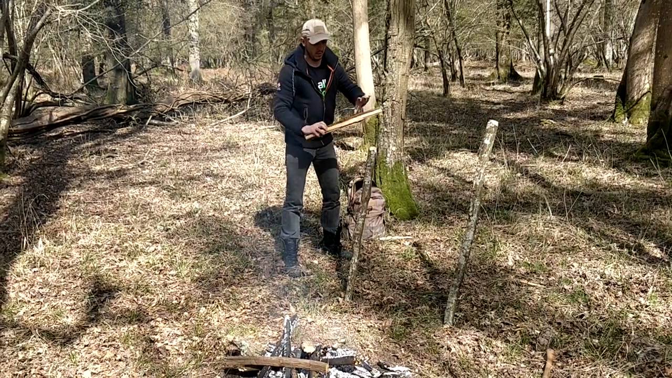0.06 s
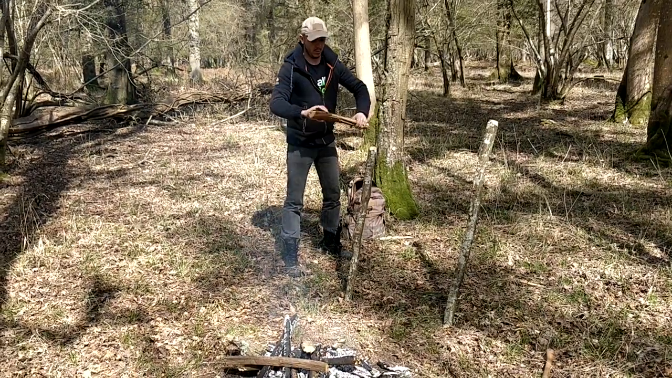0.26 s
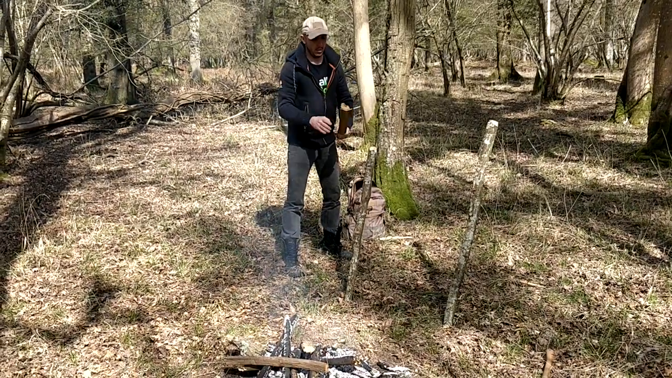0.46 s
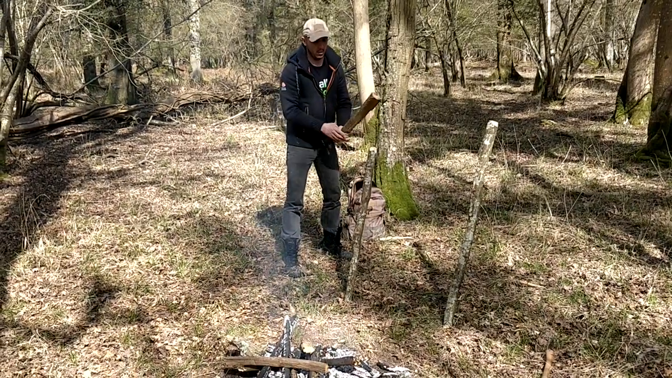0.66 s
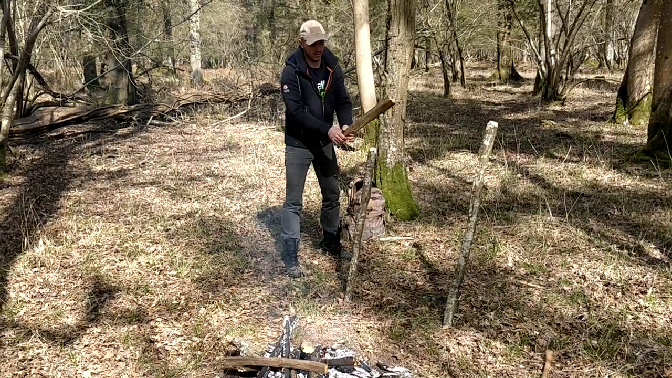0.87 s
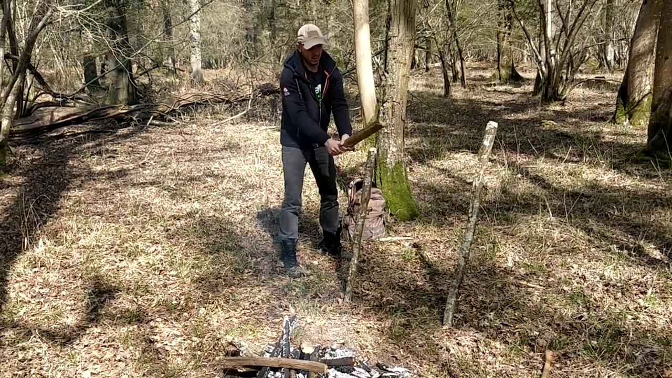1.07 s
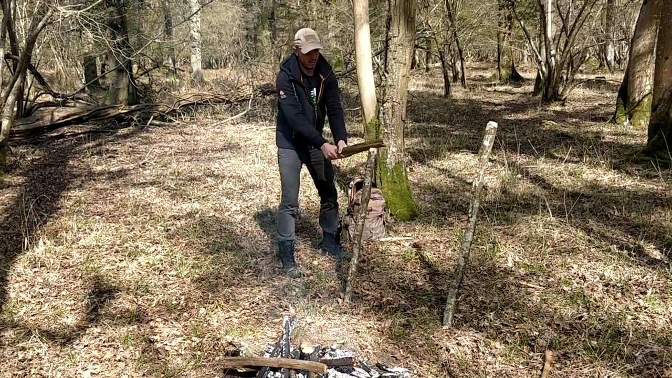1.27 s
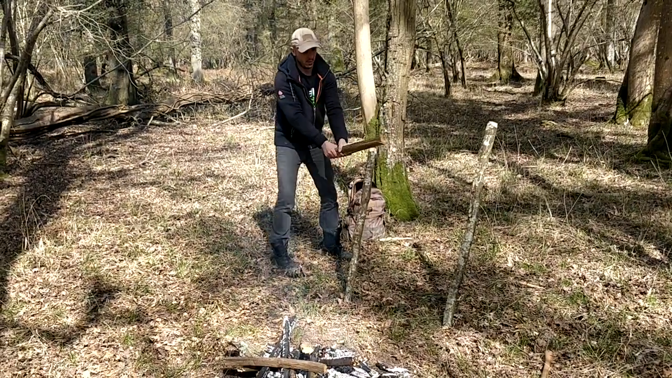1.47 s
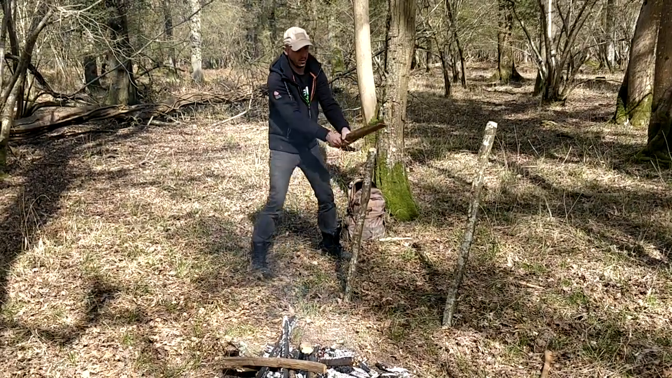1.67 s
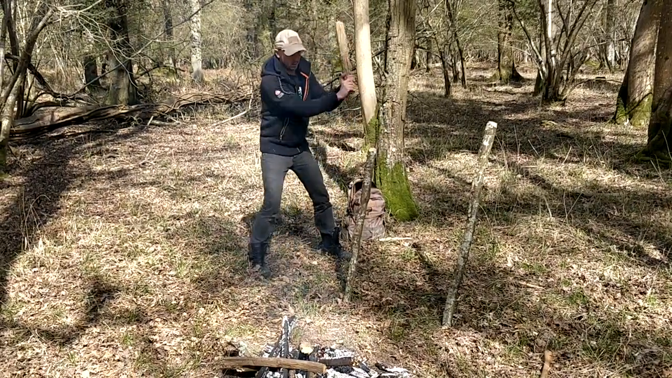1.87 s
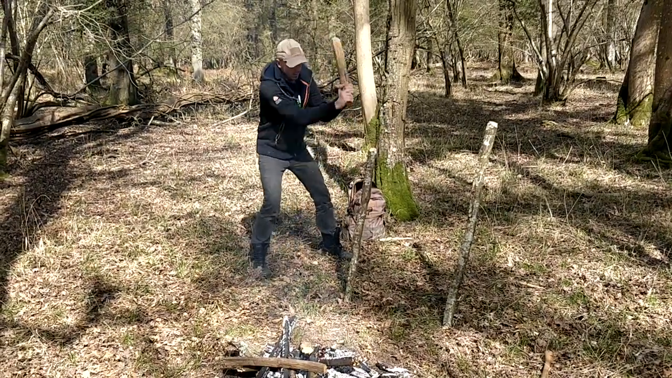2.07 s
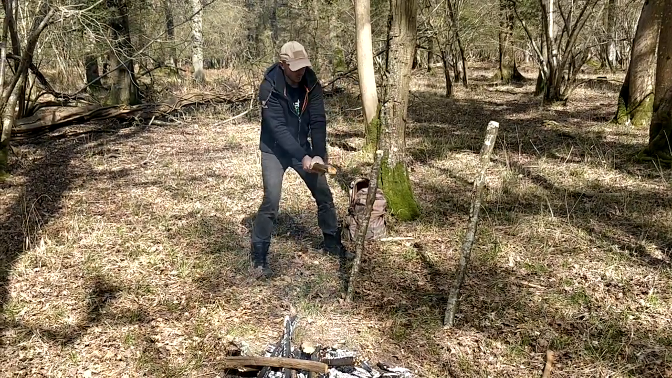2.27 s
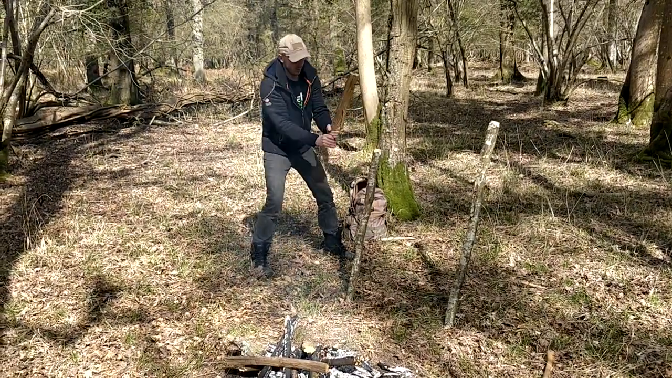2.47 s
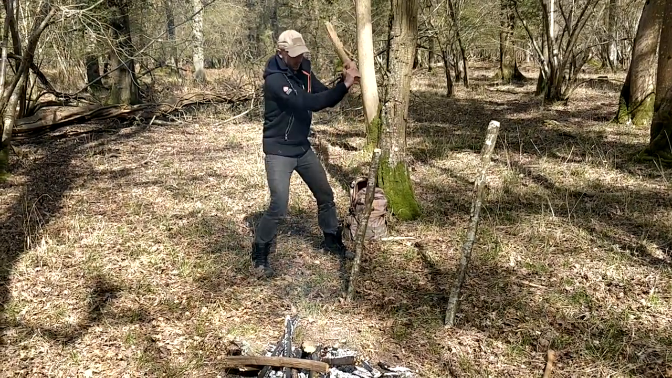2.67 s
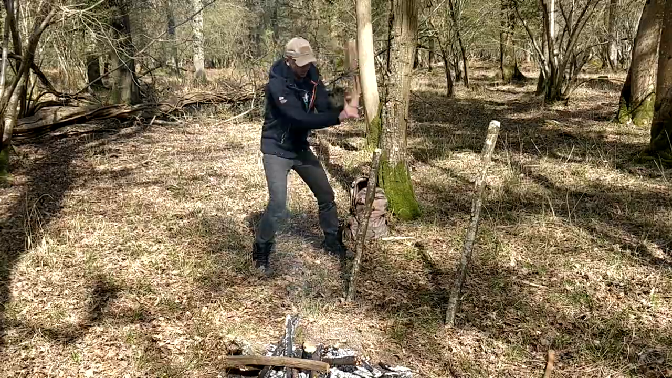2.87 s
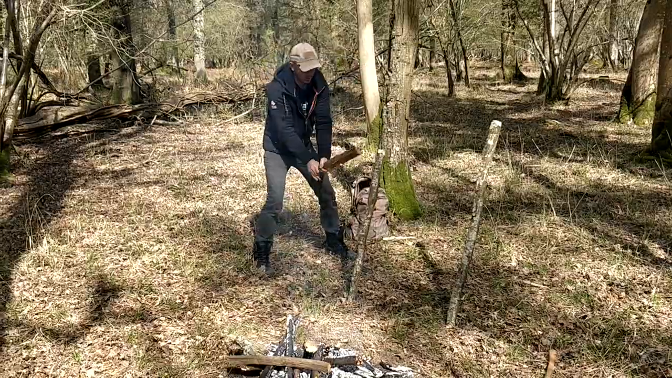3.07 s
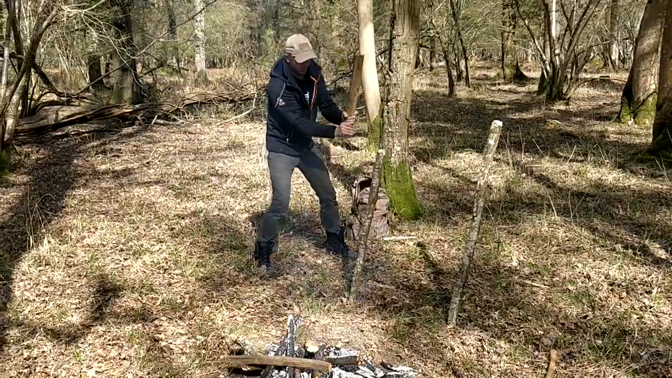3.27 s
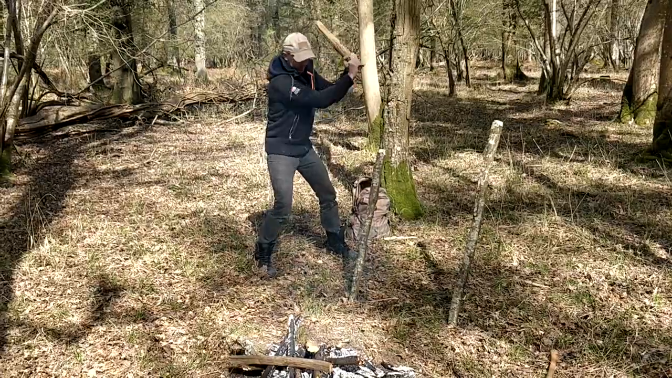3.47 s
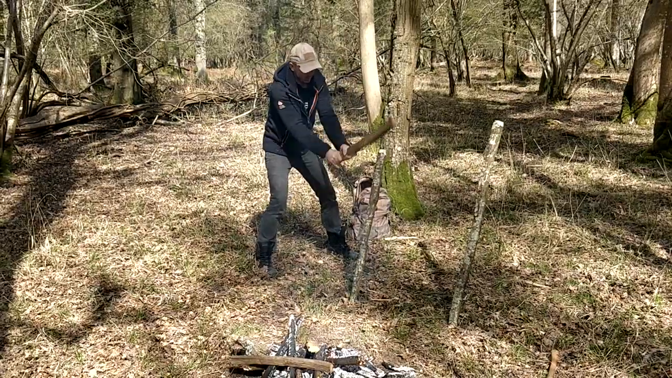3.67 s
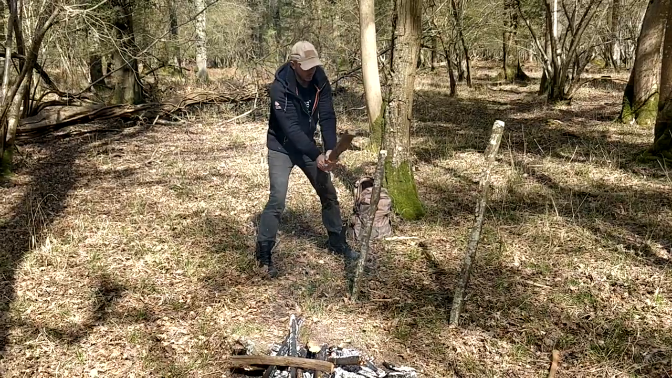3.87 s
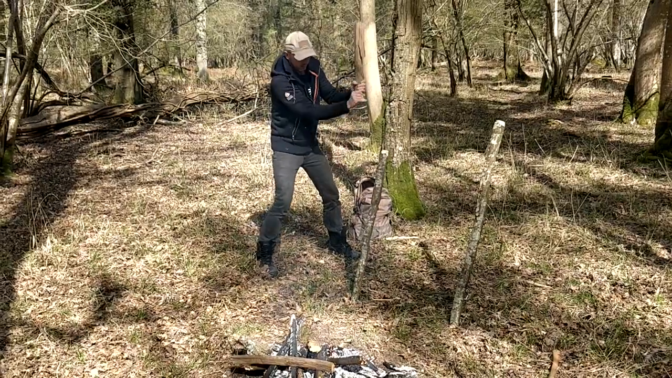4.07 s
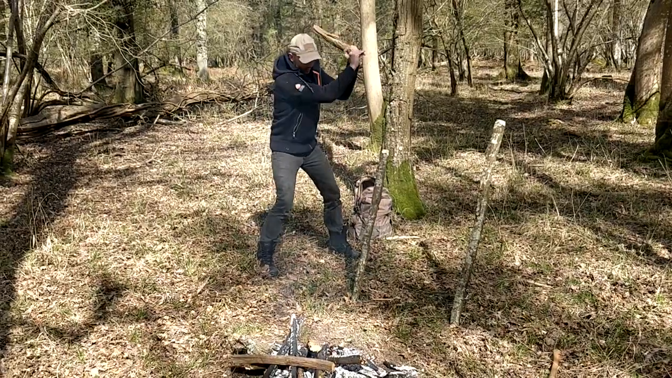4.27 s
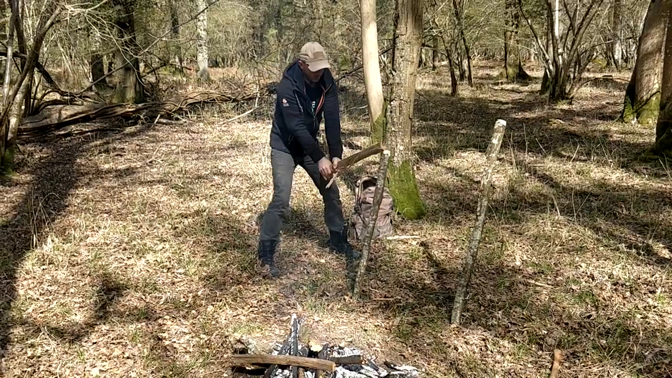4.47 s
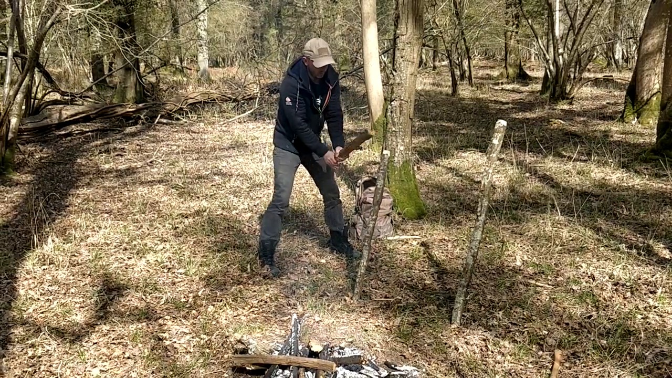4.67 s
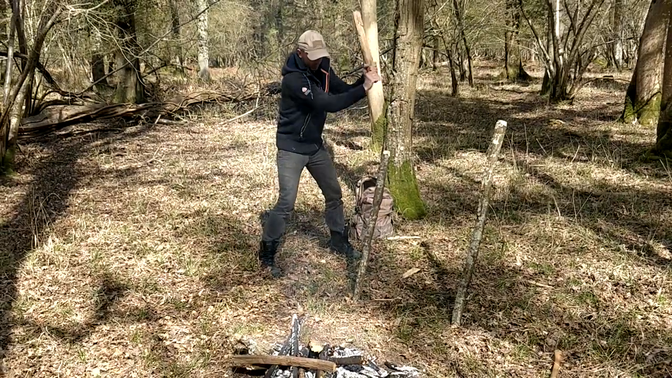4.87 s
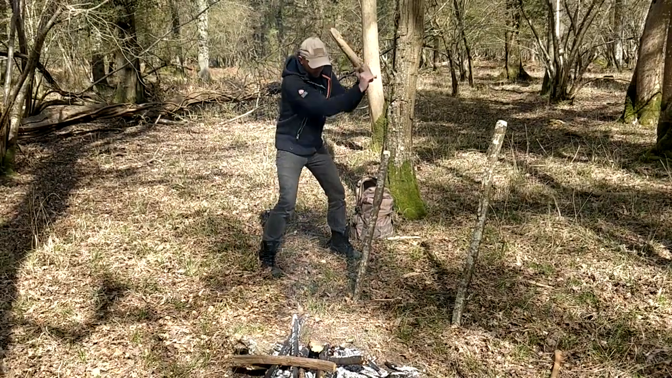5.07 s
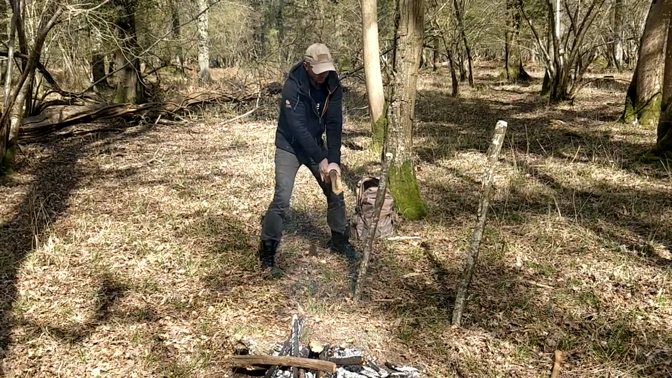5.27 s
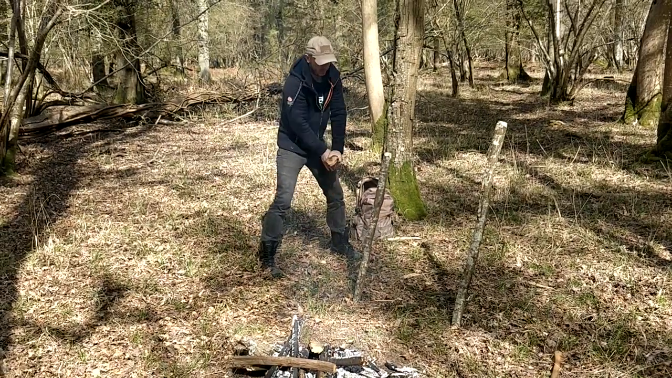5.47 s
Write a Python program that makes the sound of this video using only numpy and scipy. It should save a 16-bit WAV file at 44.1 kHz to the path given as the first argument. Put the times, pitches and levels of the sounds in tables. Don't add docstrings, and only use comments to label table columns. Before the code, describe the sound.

A quiet wood with a far, low rumble and faint airy hiss. In the first second, wind buffets the microphones in soft low flutters, a distant bird gives a few tiny high whistles before 0.6 s, and a jacket rustles with small crackles. At 1.2 s a wooden club knocks a stake: short, hollow, woody, with a soft thud of soil. A much weaker tap follows at 1.57 s amid brisk cloth rubbing. Solid blows then land at about 2.2, 3.0, 3.75, 4.5 and 5.2 s, the last strongest. Each knock dies within a tenth of a second, then trunks return dull, quick echoes and a grainy haze fading over half a second or more. A faint low hum trails the 2.2 s hit. Between blows come sleeve scuffs, leaf snaps and foot shuffles, notably near 2.5, 3.2, 4.35 and 4.7-4.8 s. Wind stirs lightly again after 5 s.

```python
import sys
import numpy as np
from scipy import signal
from scipy.fft import rfft, irfft, next_fast_len
from scipy.io import wavfile
from scipy.ndimage import map_coordinates

SR = 44100
rng = np.random.default_rng(int(sys.argv[2]) if len(sys.argv) > 2 else 0)


def file_out(sig):
    cols = np.atleast_2d(sig).T
    lim = np.clip(cols, -1, 1)
    pcm = np.round(lim * 32767).astype(np.int16)
    wavfile.write(sys.argv[1], SR, pcm)


def gain_from_decibels(decibels):
    exponent = np.asarray(decibels, float) / 20
    return 10 ** exponent


N = 244049


def unit(x):
    return x / np.sqrt(np.mean(x ** 2) + 1e-20)


def along(points, hz, column=1):
    rows = np.array(points)
    return np.interp(np.log(hz + 1), np.log(rows[:, 0] + 1), rows[:, column])


def wobble(rate):
    knots = rng.standard_normal(int(N * rate / SR) + 4)
    return map_coordinates(knots, [np.arange(N) * rate / SR])


def filtered(x, response):
    m = next_fast_len(x.shape[-1] + 4096)
    spectrum = rfft(x, m) * response(np.fft.rfftfreq(m, 1 / SR))
    return irfft(spectrum, m)[..., :x.shape[-1]]


def add(out, s, sound):
    part = out[:, round(s * SR):][:, :sound.shape[1]]
    part += sound[:, :part.shape[1]]


def swells(rows, floor_db):
    power = np.full(N, gain_from_decibels(floor_db) ** 2)
    for s, db, rise, fall in rows:
        near = np.arange(max(round((s - .3) * SR), 0), min(round((s + .8) * SR), N))
        u = near / SR - s
        level = np.where(u < 0, np.exp(-(u / rise) ** 2), gain_from_decibels(-60 * np.abs(u) / fall))
        power[near] += (gain_from_decibels(db) * level) ** 2
    return np.sqrt(power)


# pitch_hz, left_db, right_db
PORT_TONE = [(196.3, -47.5, -41), (600, -29.5, -27.5), (1740, -6, -27.5), (3000, -0.5, -2), (4680, -5, 3),
             (6480, -4, -17), (8800, -18.5, -42.5), (10940, -9, -45.5), (12460, -2.5, -31.5),
             (16600, -12.5, -29.5), (16600, -36, -56)]


def ports(hz):
    return gain_from_decibels([along(PORT_TONE, hz, column=1), along(PORT_TONE, hz, column=2)])


def port_treble(hz):
    return ports(hz) / (1 + (7000 / (hz + 1)) ** 6)


def port_body(hz):
    return ports(hz) / (1 + (hz / 7000) ** 6)


# pitch_hz, likeness_0_to_1
PORT_LIKENESS = [(60, 0.99), (290, 0.88), (640, 0.36), (1400, 0), (3000, 0.042)]


def diffuse(pair):
    def mid_and_side(hz):
        turn = np.arccos(np.clip(along(PORT_LIKENESS, hz), -1, 1)) / 2
        return np.array([np.cos(turn), np.sin(turn)])
    mid, side = filtered(pair, mid_and_side)
    return np.array([mid + side, mid - side])


# pitch_hz, density_db_per_hz
FAR_TONE = [(21, -30.5), (35, 3.5), (68, -3.5), (124, -12.5), (197, -15.5), (497, -19.5), (694, -18.5),
            (1020, -29), (1760, -33), (4000, -37), (7820, -40.5), (9120, -47.5), (13400, -40.5),
            (15300, -42.5), (16500, -50.5)]


def far_rumble():
    return unit(filtered(diffuse(rng.standard_normal((2, N))), lambda hz: gain_from_decibels(along(FAR_TONE, hz))))


# time_s, level_db, left_minus_right_db
WIND_LEVEL = [(0.0, -41.5, -9.5), (.08, -33.5, -4), (.4, -43, 0), (.48, -40.5, 6), (.6, -44, -20.5),
              (.71, -44, 7.5), (.9, -54, -9), (1.3, -60.5, -9), (1.54, -51.5, 15), (1.91, -52.5, 6.5),
              (2.26, -61.5, -9), (2.63, -50.5, 7.5), (3.101, -75.5, -6.5), (4.45, -67, -13),
              (4.96, -54, -9.5), (5.05, -56, 27), (5.12, -43, -6), (5.53, -59, -5)]
# pitch_hz, density_db_per_hz
WIND_TONE = [(8.8, -44), (15, 2), (32, -2.5), (58, -13), (168, -30.5), (200, -35.5), (260, -71),
             (440, -120)]


def wind():
    s, db, pan_db = np.transpose(WIND_LEVEL)
    level_db = [np.interp(np.arange(N) / SR, s, db + 4.0 + side * pan_db / 2) for side in (1, -1)]
    lumps = gain_from_decibels(0.89 * wobble(3.3) + 1.1 * np.array([wobble(5), wobble(4.7)]))
    flutter = filtered(rng.standard_normal((2, N)), lambda hz: gain_from_decibels(along(WIND_TONE, hz)))
    return gain_from_decibels(level_db) * unit(lumps * flutter)


def background():
    far = far_rumble()
    gusts = wind()
    return gain_from_decibels(-55.0 + 1.0 * wobble(1.8)) * far + gusts


def tone(start, end, hz, db):
    t = np.arange(round((end - start) * SR)) / SR
    drift = 1 + 0.002498 * wobble(70)[:len(t)]
    swell = np.sin(np.pi * t / (end - start)) ** .6
    wave = np.sin(2 * np.pi * hz * np.cumsum(drift) / SR)
    return gain_from_decibels(db) * np.sqrt(2) * swell * wave * np.ones((2, 1))


# start_s, end_s, pitch_hz, level_db
WHISTLES = [
    (.04, .12, 4050, -77),
    (.16, .22, 3250, -77),
    (.35, .4, 3120, -78),
    (.46, .55, 3150, -82),
]


def bird():
    out = np.zeros((2, N))
    for note in WHISTLES:
        add(out, note[0], tone(*note))
    return out


# start_s, end_s, pitch_hz, level_db
STAKE_HUM = (2.33, 2.53, 145, -53)


def stake_hum():
    out = np.zeros((2, N))
    add(out, STAKE_HUM[0], tone(*STAKE_HUM))
    return out


# time_s, tick_db, scuff_db, body_db, fall_t60_s
SNAGS = [(.376, -53, -54, -12, 0.15), (.4983, -50.5, -58.5, -25, .02), (.598, -44, -55, -6, 0.082),
         (0.9734, -44, -68, -2, 0.22), (1.7613, -33, -45.5, -28.5, 0.033), (1.939, -49, -52, -6.5, 0.019),
         (2.4854, -29, -37, -13, 0.21), (2.6789, -50, -55.5, -21, 0.096), (3.209, -49, -42, -2, 0.036),
         (2.6374, -48.5, -56.5, -4, 0.0782), (2.825, -55, -64.5, -13.5, .12),
         (3.4388, -55, -57.5, -5.5, 0.26), (3.484, -45.5, -56, -15, 0.52), (4.7337, -46, -61.5, -14, .12),
         (3.639, -52.5, -58, -15.5, 0.085), (3.895, -53, -53.5, -14.5, 0.03604),
         (4.0042, -38, -36.5, -17, 0.0727), (4.3457, -50, -48.5, -7, 0.23), (4.6993, -24, -52, -11, 0.37),
         (4.7812, -39, -44.5, -12, 0.24), (5.12, -59, -56, -14.5, .12), (5.3039, -42, -38.5, -9, 0.077)]
# peak_s, level_db, body_db, fall_t60_s
RUBS = [(0.318, -56, -6.5, 0.235), (1.16, -60.5, -11, 0.64), (1.295, -57, -5.5, 0.18),
        (1.45, -62, -14, 0.42), (1.57, -51, -17, 0.457), (1.63, -46, -18, .45), (1.691, -42.5, -13.5, .52),
        (2.1, -64, -17, 0.68), (2.519, -59, -5.5, 0.59), (3.206, -49, -1, 0.066), (3.24, -60, -2.5, 0.35),
        (3.55, -68, -2, 0.992), (4.15, -64, -23.5, 0.69), (4.229, -60.5, -19, .07), (4.38, -51.5, -8, 0.1),
        (4.463, -62, -2, 0.192), (4.807, -39, -9, 0.062), (4.92, -57.5, -16, 0.88), (5.255, -45, -4, 0.317),
        (5.47, -66.5, 0, 0.727)]
# peak_s, level_db, rise_s, fall_t60_s
STEPS = [
    (.6, -59.5, 0.0033, 0.089),
    (.974, -58, 0.002603, 0.044),
    (1.69, -54.5, 0.081, 0.28),
    (2.49, -47, 0.0027, 0.072),
    (3.212, -73, .004, .06),
    (4.35, -62, .004, 0.17),
]
# pitch_hz, density_db_per_hz
STEP_TONE = [(200, -21.5), (400, -2), (720, 1.5), (1200, -4.5), (2500, -26), (4000, -33)]


def scuffs():
    snag_rise_s, rub_rise_share = 0.001, 0.1
    rows = [(s + snag_rise_s, db, body_db, snag_rise_s, fall) for s, _, db, body_db, fall in SNAGS]
    rows += [(s, db, body_db, rub_rise_share * fall, fall) for s, db, body_db, fall in RUBS]
    s, db, body_db, rise, fall = np.transpose(rows)
    noise = rng.standard_normal((3, 2, N))
    grain = unit(gain_from_decibels(1.5 * wobble(66) + 1.73 * wobble(400)))
    treble_noise, body_noise, feet_noise = noise * grain
    treble = filtered(treble_noise * swells(zip(s, db, rise, fall), floor_db=-72), port_treble)
    body = filtered(body_noise * swells(zip(s, db + body_db, rise, fall), floor_db=-80), port_body)
    shuffle = unit(filtered(diffuse(feet_noise), lambda hz: gain_from_decibels(along(STEP_TONE, hz))))
    return gain_from_decibels(14.5) * (treble + body) + swells(STEPS, floor_db=-100) * shuffle


# time_s, peak_db, body_db
CRACKLES = [(.4828, -58, -27), (.5826, -52.5, -22), (0.9833, -35, -14), (1.085, -54.5, -6),
            (1.293, -50.5, -22), (1.4401, -55.5, -20), (1.5429, -48, -20), (1.8397, -53.5, -25),
            (2.0967, -55.5, -23.5), (2.4838, -34.5, -16.5), (3.2036, -43, -14), (3.4057, -32, -25),
            (4.1684, -61.5, -20), (4.802, -40, -21), (5.1048, -55, -14.5)]


def ticks():
    rows = [(s, db, body_db - 4) for s, db, _, body_db, _ in SNAGS] + CRACKLES
    s, db, body_db = np.transpose(rows)
    rise, fall = np.full(len(s), .0002), np.full(len(s), .009)

    def snaps(level_db):
        return np.sign(rng.standard_normal(N)) * swells(zip(s, level_db, rise, fall), floor_db=-140)
    treble = filtered(snaps(db), port_treble)
    body = filtered(snaps(db + body_db), port_body)
    return gain_from_decibels(-5.0) * treble + gain_from_decibels(6.5) * body


# pitch_hz, level_db, t60_s, build_up_s
HAZE_BANDS = [(100, 5.5, 0.17, 0.0097), (324, -11.5, 1, 0.04), (648.15, 6.5, 0.71, 0.016),
              (1474.6, -1, 0.88, 0.01), (3080, -6, 0.649, 0.057), (5500, -12, 0.78, .02),
              (6500, -22, 0.19, 0.024), (13000, -23, 0.091, .01)]


def haze():
    swarm = rng.standard_normal((2, SR)) * unit(gain_from_decibels(2.1 * wobble(140)[:SR]))
    hz, t, z = signal.stft(swarm, SR, nperseg=256)
    level_db, t60, build = (along(HAZE_BANDS, hz, column=k)[:, None] for k in (1, 2, 3))
    far_tail = gain_from_decibels(-16.0 - 60 * t / (9.6 * t60)) * (1 - t.clip(0, 1))
    decay = gain_from_decibels(-60 * t / t60) + far_tail
    shape = gain_from_decibels(level_db) * decay * (1 - np.exp(-(t / np.abs(build)) ** 2))
    return diffuse(signal.istft(z * shape, SR, nperseg=256)[1])


# delay_s, left_db, right_db
TRUNKS = [(.022, -14, -20.5), (.031, -19, -25.5), (0.056, -37.5, -47), (0.077, -50.5, -43.5),
          (.105, -18.5, -21.5), (0.129, -22.5, -20)]


def trunk_echoes(out, s, level_db, knock, t):
    dull = filtered(knock * gain_from_decibels(-60 * t / 0.009), lambda hz: 1 / (1 + (hz / 1800) ** 2))
    for delay, left_db, right_db in TRUNKS:
        echo_db = level_db - 7.3 + np.array([[left_db], [right_db]]) + rng.normal(0, 0.99)
        add(out, s + delay, gain_from_decibels(echo_db) * dull)


def ring(modes, t, strengths_db, spread_db):
    hz, left_db, right_db, t60 = np.transpose(modes)[:, :, None]
    hz = hz * (1 + .005 * rng.standard_normal(hz.shape))
    level_db = strengths_db + rng.normal(0, spread_db, hz.shape) - 60 * t / t60
    waves = -gain_from_decibels(level_db) * np.sin(2 * np.pi * hz * t)
    return np.array([(gain_from_decibels(left_db) * waves).sum(0), (gain_from_decibels(right_db) * waves).sum(0)])


# pitch_hz, left_db, right_db, t60_s
SOIL = [(56, -21.5, -27, .12), (113.4, -20.5, -20.5, 0.087), (220.8, 2.5, 4, 0.013)]


def soil_thud(t, thud_db):
    return ring(SOIL, t, thud_db, spread_db=.8) * (1 - np.exp(-t / .004))


BEND_HZ = 1641


def landed(modes, bright_db, foot_db, shaft_db, bend_db, club_db):
    hz = np.array(modes)[:, :1]
    strengths_db = bright_db * np.log2(hz / 1000)
    for centre, db in ((780, foot_db), (1075.6, shaft_db), (BEND_HZ, bend_db), (2950, club_db)):
        strengths_db = strengths_db + db * np.exp(-(np.log2(hz / centre) / 0.24) ** 2)
    return strengths_db


# time_s, strength_db, thud_db, crack_db, contact_s
BLOWS = [
    (1.1975, -14, -1, -8.5, 0.004),
    (1.5674, -31.5, 10, -8, 0.00385),
    (2.2069, -9, 4, 1, 0.0054),
    (2.9903, -10, 2, -3, 0.0077),
    (3.7357, -10.5, 5.5, 2, 0.014),
    (4.4829, -8, 2, -1, 0.0082),
    (5.2210, -6, 5.5, 0.5, 0.006),
]
# brightness_db_per_octave, foot_bend_db, shaft_bend_db, top_bend_db, club_db
LANDINGS = [(4.52, 4, 1.4, 15, 1.7), (-3.8, 5, -1.5, -2, -3), (1.7, -2, 0.5, 4.5, -3.5),
            (2.85, 2, 2.5, 10, -2), (0.92, 3.5, 2, 5, 1), (2.8, 3, 0.29, 7, -5), (0.63, 0, -5.5, -2, 6.5)]
# level_db, brightness_db_per_octave
ECHOES = [(-0.5, -2.3), (2, -4), (4, -0.42), (4, -1.46), (7, -0.74), (7.5, -0.3), (3, -0.2)]
# pitch_hz, left_db, right_db, t60_s
STAKE = [(545, -2.5, -2, 0.057), (630, -2, -3.5, .035), (768, -1.5, -2, 0.025), (1013, -6, -6.5, 0.04),
         (1096.5, 0, -3.5, 0.029), (1537, -6, -10, 0.021), (1740, -8.5, -15, .025)]
# pitch_hz, left_db, right_db, t60_s
CLUB = [(2300, -10, -17, 0.044), (2600, -11.5, -18.5, 0.035), (2924, -6, -9.5, 0.019),
        (3400, -15, -16.5, 0.035), (4054, -23, -12.5, 0.014), (4377, -16, -14.5, 0.013)]
# grip_drop_db, soil_time_s, soil_drop_db
DAMPING = (-8.5, 0.018, -7)


def blows():
    out, t = np.zeros((2, N)), np.arange(SR // 5) / SR
    grip_db, settle, soil_db = DAMPING
    step = lambda s: np.clip((t - s) / .0006, 0, 1)
    for (s, db, thud_db, crack_db, touch), landing, (echo_db, tilt_db) in zip(BLOWS, LANDINGS, ECHOES):
        grip = gain_from_decibels(grip_db * step(touch) + soil_db * step(settle)) * (1 - np.exp(-t / 0.0003045))
        knock = grip * ring(STAKE, t, landed(STAKE, *landing), spread_db=.6)
        direct = knock + soil_thud(t, thud_db)
        direct[1] = np.roll(direct[1], 5)
        direct += grip * ring(CLUB, t, landed(CLUB, *landing), spread_db=1.5)
        crush = grip * gain_from_decibels(-60 * t / 0.095) + gain_from_decibels(-21.0 - 60 * t / 0.52)
        direct += gain_from_decibels(crack_db - 3) * crush * filtered(rng.standard_normal((2, len(t))), ports)
        add(out, s, gain_from_decibels(db + 1.0) * direct)
        trunk_echoes(out, s, db + echo_db, knock, t)

        def haze_tone(hz):
            near_bend = np.exp(-(np.log2((hz + 1) / BEND_HZ) / .6) ** 2)
            carried_db = 0.65 * (landing[3] - 7.5) * near_bend
            return gain_from_decibels(carried_db + tilt_db * np.log2(hz.clip(600, 10000) / 2000))
        add(out, s, gain_from_decibels(db + echo_db - 23.0) * filtered(haze(), haze_tone))
    return out


def scene():
    return blows() + scuffs() + ticks() + background() + bird() + stake_hum()


def low_pass(x):
    return signal.sosfilt(signal.butter(12, 16780, fs=SR, output="sos"), x)


def record(dry):
    rounded = dry / (1 + np.abs(dry / .95) ** 4) ** (1 / 4)
    band = filtered(rounded, lambda hz: 1 / (1 + (hz / 16200) ** 40) * 1j * hz / (35 + 1j * hz))
    return low_pass(band)


dry = scene()
out = record(dry)
file_out(out)
```